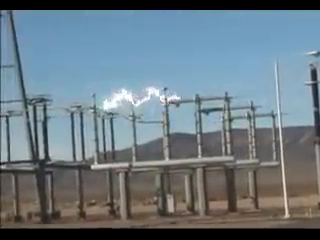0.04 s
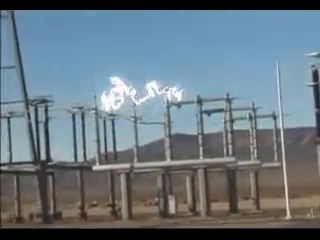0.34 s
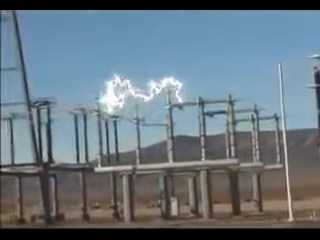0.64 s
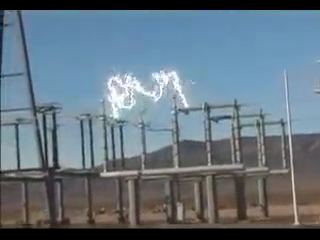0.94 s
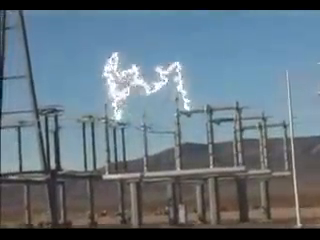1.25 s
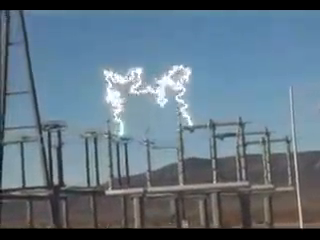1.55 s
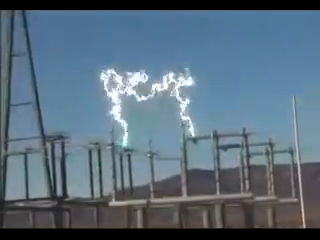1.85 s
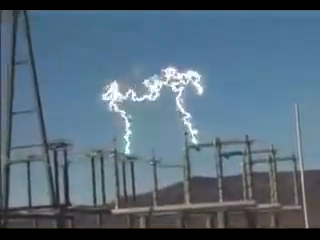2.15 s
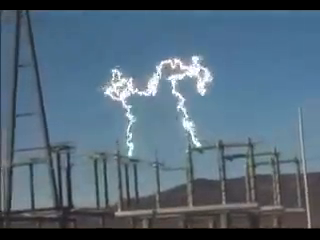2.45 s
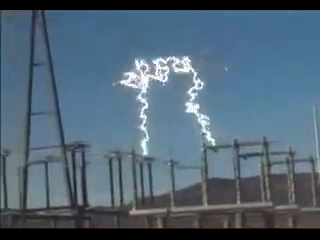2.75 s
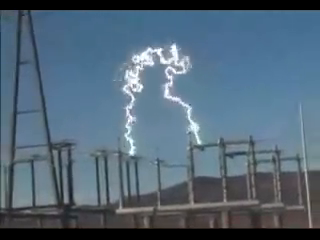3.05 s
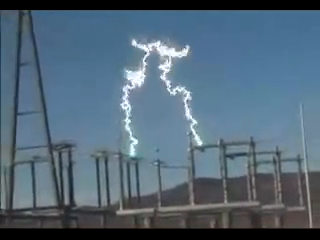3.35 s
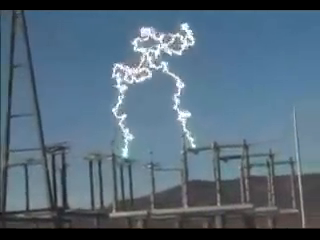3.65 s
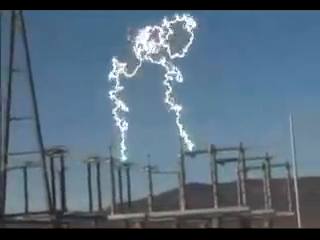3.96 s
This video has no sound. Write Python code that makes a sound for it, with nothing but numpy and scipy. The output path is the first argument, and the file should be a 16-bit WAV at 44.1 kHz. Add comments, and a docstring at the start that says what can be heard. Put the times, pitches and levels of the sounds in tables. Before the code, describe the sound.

Buzzing crackle of an electric arc swelling outdoors, with a low hum and sharp snaps.

```python
"""In a substation yard, a high-voltage arc stands between the opening arms of a switch and climbs into a
long, tangled loop. Every half cycle of the mains heats the channel, radiating a hum and a burst of tiny
sparks. The partials swell and fade as the loop changes shape, and the crackle grows fuller with its
length; now and then a loop shorts out with a snap. Heated air churns beneath, and steelwork and ground
scatter the sparks' sound. A gain control ducks briefly after the sharpest peaks."""
import sys
import numpy as np
from scipy import signal
from scipy.fft import rfft, irfft
from scipy.io import wavfile
from scipy.ndimage import uniform_filter1d

SR = 44100
rng = np.random.default_rng(int(sys.argv[2]) if len(sys.argv) > 2 else 0)


def dump(signal):
    """Clip the signal to [-1, 1] and save it as 16-bit WAV at the path in sys.argv[1]."""
    limited = np.clip(np.atleast_2d(signal).T, -1, 1)
    pcm = np.round(limited * 32767).astype(np.int16)
    wavfile.write(sys.argv[1], SR, pcm)


N = 176400
T = np.arange(N) / SR
PULSE_HZ = 119.88  # heating rate, twice the mains frequency
# growth of the arc: t/s, length as a share of the full loop
ARC_LENGTH = [(0, 0.083), (.8, 0.18), (1.4, 1), (2.3, 1), (4, 1)]


def arc_hum():
    """Periodic thermal expansion radiates harmonics; a longer channel makes them drift and flutter."""
    # envelopes of partials 1 to 4: t/s, level/dB
    first = [(0.0, -21), (0.02, -18), (0.66, -13.5), (1.08, -17.5), (1.12, -12), (1.43, -19), (1.5, -15),
             (1.79, -13), (1.9, -24.5), (2.33, -16.5), (2.35, -14), (2.75, -19.5), (2.78, -29), (2.86, -16),
             (2.94, -35), (2.99, -12), (3.05, -33.5), (3.36, -11.5), (3.42, -31), (3.53, -12.5),
             (3.95, -15), (4.0, -9)]
    second = [(0.0, -16.5), (0.02, -16), (0.4, -14.5), (0.96, -17.5), (1.17, -34), (1.28, -21.5),
              (1.68, -27), (1.73, -18.5), (1.9, -14.5), (2.19, -20), (2.45, -19.5), (2.52, -29),
              (2.75, -18), (2.87, -28.5), (3.01, -17), (3.12, -29.5), (3.29, -29), (3.43, -14), (3.71, -36),
              (3.75, -20.5), (3.88, -18), (4.0, -27)]
    third = [(0.0, -31.5), (0.28, -23), (0.66, -35.5), (0.82, -21), (0.87, -31), (0.99, -21.5), (1.43, -42),
             (1.5, -26.5), (1.83, -21.5), (2.42, -33), (2.95, -21), (3.17, -24), (3.24, -40), (3.29, -25.5),
             (3.42, -30), (3.68, -18), (3.82, -32.5), (4.0, -19)]
    fourth = [(0, -43.5), (.8, -37), (1.3, -42), (2.4, -34), (3, -32), (3.2, -21.5), (3.35, -34),
              (3.7, -29.5), (4, -35)]
    # for each partial at full length: detuning f/Hz; flutter as a share of the amplitude
    slide_hz = [0.525, -1.1, -0.353, 0.497]
    flutter_depth = [0.14, 0.15, 0.14, 0.41]
    length, out = curve(ARC_LENGTH), np.zeros(N)
    for k, level in enumerate([first, second, third, fourth]):
        turns = np.cumsum((k + 1) * PULSE_HZ + slide_hz[k] * length) / SR
        turns += 0.13 * length * wander(hz=3.9)  # the writhing channel shifts the phase
        flutter = 1 + flutter_depth[k] * length * (wander(hz=22) + 1j * wander(hz=22))
        out += amp(curve(level)) * (flutter * np.exp(2j * np.pi * turns)).imag
    return out


def spark_crackle():
    """Modulated shot noise: sparks bunch in each half cycle, and a long channel evens the bursts."""
    # envelope of the crackle and tilt of its treble: t/s, relative level/dB
    envelope = [(0.0, -32.4), (0.19, -28), (0.32, -32), (0.71, -26), (0.82, -29.4), (0.88, -25),
                (0.98, -28.5), (1.23, -25), (1.66, -22.3), (1.71, -27), (1.84, -23.5), (2.2, -22.1),
                (2.22, -26), (2.31, -23.3), (2.37, -25), (2.86, -22), (2.9, -25.5), (3.16, -22.5),
                (3.41, -22.5), (3.67, -23), (3.71, -22.5), (4.0, -22)]
    treble = [(0, 2), (.6, -1), (.9, 1.5), (1.18, 2), (1.33, -3), (1.64, 2), (1.72, 1), (2.15, -1.5),
              (2.4, -2), (2.74, 0), (3.05, -0.5), (3.25, -1.5), (3.5, 0), (4, -1.5)]
    # spectra of the short, the rising and the tall arc: f/Hz, relative level/dB
    short_arc = [(200, -24.0), (400, -15), (530, -22), (620, -6), (780, 2), (900, 2.5), (1100, -1.5),
                 (1380, -11), (1650, -6), (2200, -14.5), (2900, -13), (3200, -16), (4000, -20.5),
                 (4800, -21.5), (7000, -32), (9900, -46)]
    rising_arc = [(200, -23.5), (400, -16.5), (530, -14), (620, 1), (780, 2), (900, -3.5), (1100, -10.5),
                  (1380, -7.5), (1650, -11), (2200, -10.5), (2900, -13), (3200, -16.5), (4000, -19.5),
                  (4800, -21.5), (7000, -30), (9900, -45.5)]
    tall_arc = [(200, -27.5), (400, -2.5), (530, -9), (620, 1), (780, -5), (900, -6), (1100, -0.5),
                (1380, -11), (1650, -6.5), (2200, -12), (2900, -12), (3200, -15), (4000, -18.5),
                (4800, -20), (7000, -30.5), (9900, -45)]
    # moments at which each of these spectra holds alone: t/s
    stage_times = [0.58, 1.32, 3]
    band_edges_hz, band_spread_db, spark_spread_db = [1100, 2200, 4200], 2, 2
    sparks_per_s, burst_spread_db = grown(2500, 5000), grown(3, 1.13)
    jitter_cycles, width_cycles = 0.1, 0.19
    cycle, phase = np.divmod(PULSE_HZ * T, 1)
    # each burst draws its own timing, strength and four band gains
    lag, strength, *tints = np.clip(rng.standard_normal((N, 6)), -1.7, 1.7)[cycle.astype(int)].T
    burst = np.exp(-.5 * ((phase - .5 - jitter_cycles * lag) / width_cycles) ** 2)
    floor = grown(0.59, 0.88)  # share of the spark amplitude left between bursts
    sizes = amp(spark_spread_db * np.minimum(rng.exponential(1, N), 4) + burst_spread_db * strength)
    impulses = (rng.random(N) < sparks_per_s / SR) * rng.choice([-1, 1], N) * sizes
    spectrum = rfft(impulses * (floor + (1 - floor) * burst))
    band = np.searchsorted(band_edges_hz, np.fft.rfftfreq(N, 1 / SR))
    sparks, sound = np.zeros(N), np.zeros(N)
    for k, tint in enumerate(tints):
        gain = amp(band_spread_db * tint + curve(treble) * k / len(band_edges_hz))
        sparks += irfft(spectrum * (band == k), N) * uniform_filter1d(gain, size=60)
    for weights, shape in zip(np.eye(3), [short_arc, rising_arc, tall_arc]):
        sound += np.interp(T, stage_times, weights) * colour(sparks, shape)
    running_rms = np.sqrt(abs(uniform_filter1d(sound ** 2, size=5000)) + 1e-12)
    surge_db = 0.32 * wander(hz=34)
    return amp(curve(envelope) + 0.5 + surge_db) * sound / running_rms


def loop_snaps():
    """Superposition: shocks from along a shorting loop arrive within milliseconds as one snap."""
    # loops shorting out: t/s, relative level/dB, duration/s, pitch f/Hz
    shorts = [(0.09, -21, 0.0025, 910), (0.108, -18.5, 0.0026, 850), (0.133, -23, 0.0035, 870),
              (0.184, -20, 0.0026, 805), (.2425, -20.5, 0.004, 2630), (.277, -23, 0.0043, 1300),
              (.284, -18, 0.0041, 770), (0.362, -17.5, 0.0034, 1000), (.376, -19, 0.0033, 850),
              (.5005, -20, 0.0033, 850), (0.588, -32, 0.0025, 764), (0.7006, -19, 0.0046, 700),
              (0.749, -23, 0.002, 1800), (0.869, -21, 0.0032, 1420), (0.901, -17, 0.0047, 1090),
              (1.011, -16.5, 0.0047, 1090), (1.067, -21, 0.0039, 1910), (1.1657, -14, 0.0059, 1330),
              (1.2108, -13, .005, 1000), (1.323, -21, 0.0051, 750), (1.392, -13, 0.003, 720),
              (1.425, -14, 0.0036, 1050), (1.4407, -17, .004, 810), (1.534, -19, 0.0039, 2180),
              (1.631, -17, 0.0057, 800), (1.674, -30, .003, 850), (1.8935, -18, .004, 750),
              (2.021, -8, 0.0022, 786), (2.084, -16, .004, 940), (2.1946, -16, .004, 1640),
              (2.2032, -10, 0.0048, 980), (2.2458, -11.5, 0.0026, 1800), (2.3175, -17, 0.0076, 1900),
              (2.467, -13.5, 0.0034, 1100), (2.5977, -15.5, 0.005, 1100), (2.732, -17.5, 0.0047, 1800),
              (2.873, -12.5, 0.0058, 1460), (2.946, -8, 0.0051, 1750), (3.175, -12, 0.0037, 1500),
              (3.27, -11.5, 0.0026, 1510), (3.526, -19, .003, 1300), (3.607, -13, 0.0057, 1400),
              (3.7025, -13, 0.0028, 1010), (3.754, -17, 0.0036, 1500), (3.924, -29, 0.0031, 2600)]
    # spectrum of a snap: f/pitch, relative level/dB
    snap_spectrum = [(.15, -18.5), (.3, -5), (.6, -1), (1, 0), (1.6, -5.5), (2.5, -11), (4, -18.5),
                     (10, -29)]
    shocks_per_s, gain_db, air_cutoff_hz = 7000, -3, 6570
    out = np.zeros(N)
    shocks = rng.choice([-1, 1], N) * rng.uniform(0.55, 1, N) * (rng.random(N) < shocks_per_s / SR)
    for start, db, duration, hz in shorts:
        at, count = round(start * SR), round(duration * SR)
        shape = [(hz * ratio, level) for ratio, level in snap_spectrum]
        snap = colour(shocks[at:at + count], shape)[:N - at]
        out[at:at + len(snap)] += amp(db + gain_db) * unit(snap) * np.sqrt(count / len(snap))
    air_absorption = signal.butter(2, air_cutoff_hz, fs=SR, output="sos")
    return signal.sosfilt(air_absorption, out)


def air_churn():
    """Turbulence in the heated air around the channel radiates a low, uneven roar."""
    # spectrum of the roar: f/Hz, relative level/dB
    spectrum = [(20, -13), (45, -6.5), (75, -6), (110, 6.5), (170, 3), (240, -1), (320, 2), (420, -8.5),
                (520, -15), (700, -12), (2000, -55)]
    # envelope of the roar: t/s, level/dB
    envelope = [(0, -28.5), (.5, -29.5), (.8, -27), (1.2, -25), (2.5, -27), (4, -27.5)]
    return amp(curve(envelope)) * colour(rng.standard_normal(N), spectrum)


def yard_scatter(x):
    """Scattering from steelwork and ground returns faint echoes that decay exponentially."""
    gain_db, t60_s, echoes_per_s, first_echo_s = -12, 0.2, 1500, 0.004
    t = T[:SR // 2]
    echoes = rng.standard_normal(len(t)) * (rng.random(len(t)) < echoes_per_s / SR)
    echoes *= (t > first_echo_s) * amp(-60 * t / t60_s)
    return amp(gain_db) * signal.oaconvolve(x, echoes / np.linalg.norm(echoes))[:N]


def amp(db):
    """Amplitude ratio of a level in decibels."""
    return 10 ** (np.asarray(db) / 20)


def unit(x):
    """Normalisation to an rms of 1."""
    return x / np.sqrt(np.mean(x ** 2) + 1e-20)


def curve(points):
    """Linear interpolation between (t/s, value) points."""
    return np.interp(T, *np.transpose(points))


def grown(short, long):
    """Linear dependence on the arc's length, from short at zero to long at the full loop."""
    return short + (long - short) * curve(ARC_LENGTH)


def wander(hz):
    """Random fluctuation: noise low-passed at hz, with an rms of 1."""
    rolloff = 1 + (np.fft.rfftfreq(N, 1 / SR) / hz) ** 4
    return unit(irfft(rfft(rng.standard_normal(N)) / rolloff, N))


def colour(x, points, size=4096):
    """Minimum-phase filtering at unit energy, with the given (f/Hz, level/dB) shape."""
    hz, db = np.transpose(points)
    log_hz = np.log(abs(np.fft.fftfreq(size, 1 / SR)) + 1)
    log_gain = np.log(amp(np.interp(log_hz, np.log(hz + 1), db)) + 1e-5)
    response = np.exp(np.conj(signal.hilbert(log_gain)))
    taps = np.fft.ifft(response).real[:size // 2]
    return signal.oaconvolve(x, taps / np.linalg.norm(taps))[:N]


def scene():
    """The arc's direct sound and the sparks' echoes superpose at the edge of the yard."""
    sparks = spark_crackle() + loop_snaps()
    return (arc_hum() + air_churn() + sparks + yard_scatter(sparks))[None]


def record(dry):
    """Compression ducks the level after sharp peaks; saturation rounds them and a low-pass follows."""
    threshold_db, share_removed, recovery_db_per_s = -8.5, 0.45, 110
    attack_s = 0.0055  # too slow to catch a snap
    ceiling, cutoff_hz = 0.72, 10013
    peak_db = 20 * np.log10(abs(dry[0]) + 1e-6)
    fall_db = recovery_db_per_s * T
    held_db = np.maximum.accumulate(peak_db + fall_db) - fall_db
    excess_db = np.maximum(held_db - threshold_db, 0)
    pole = np.exp(-1 / (attack_s * SR))
    ducked = dry / amp(share_removed * signal.lfilter([1 - pole], [1, -pole], excess_db))
    rounded = ducked / (1 + (ducked / ceiling) ** 8) ** (1 / 8)
    lowpass = signal.firwin(601, cutoff_hz, window=("kaiser", 9), fs=SR)
    return signal.oaconvolve(rounded, lowpass[None], "same")


dry = scene()
out = record(dry)
dump(out)
```